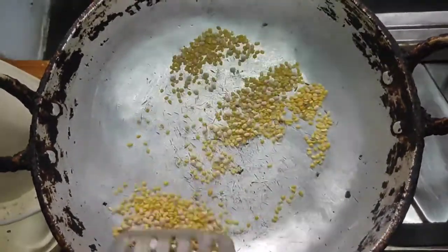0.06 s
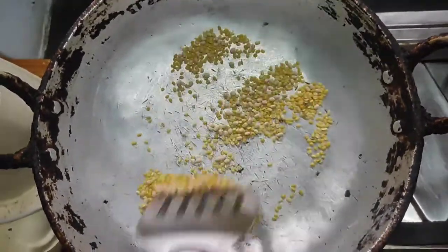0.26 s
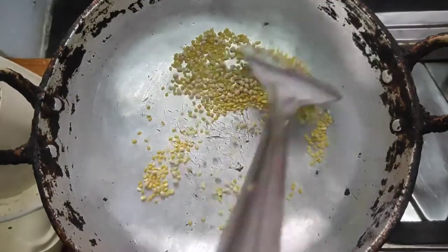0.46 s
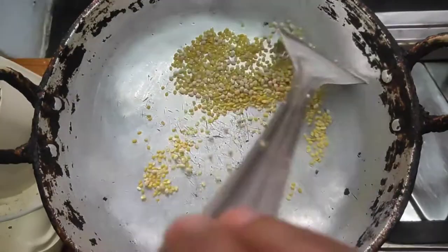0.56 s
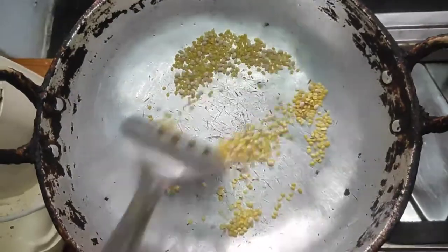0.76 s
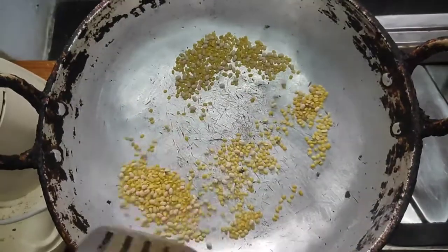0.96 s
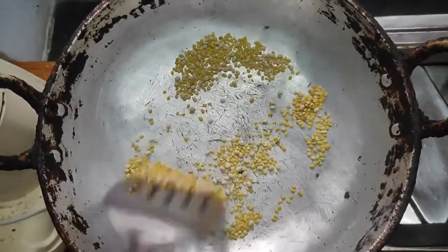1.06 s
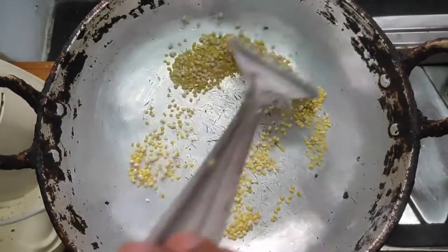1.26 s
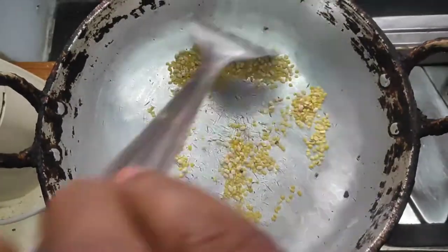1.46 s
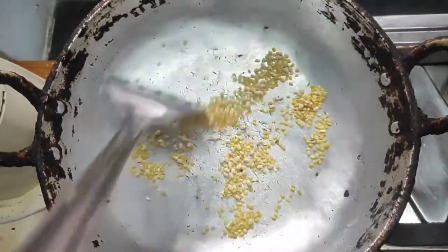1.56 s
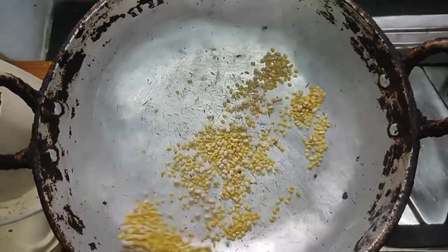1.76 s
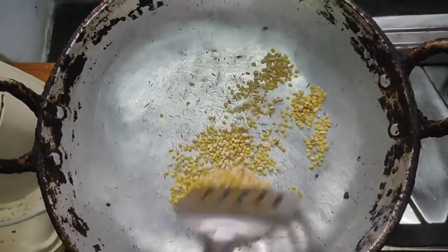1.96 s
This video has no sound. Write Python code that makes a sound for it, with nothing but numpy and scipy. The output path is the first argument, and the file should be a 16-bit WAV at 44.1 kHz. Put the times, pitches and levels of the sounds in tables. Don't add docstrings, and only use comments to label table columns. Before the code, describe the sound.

Steel spatula clanks and scrapes in a pan of pattering dry lentils above a softly roaring flame

```python
import sys
import numpy as np
from scipy import signal
from scipy.fft import rfft, irfft, next_fast_len
from scipy.io import wavfile
from scipy.ndimage import uniform_filter1d, map_coordinates

SR = 44100
rng = np.random.default_rng(int(sys.argv[2]) if len(sys.argv) > 2 else 0)


def voltage_ratio(level):
    return 10 ** (np.asarray(level, float) / 20)


def wav_record(signal):
    frames = np.transpose(np.atleast_2d(signal))
    bounded = np.clip(frames, -1, 1)
    quanta = np.round(bounded * 32767).astype(np.int16)
    wavfile.write(sys.argv[1], SR, quanta)


N = 88200


def unit(x):
    return x / np.sqrt(np.mean(x ** 2) + 1e-20)


def along(points, hz):
    f, value = np.transpose(points)
    return np.interp(np.log(hz + 1), np.log(f + 1), value)


def wobble(rate):
    knots = rng.standard_normal(int(N * rate / SR) + 4)
    return map_coordinates(knots, [np.arange(N) * rate / SR])


def filtered(x, response):
    n = x.shape[-1]
    padded = next_fast_len(n + min(n, SR // 2))
    spectrum = rfft(x, padded) * response(np.fft.rfftfreq(padded, 1 / SR))
    return irfft(spectrum, padded)[..., :n]


def modes(table, extra_db=0):
    centre, width, db = np.transpose(table)[..., None]
    gain = (-1) ** np.arange(len(table))[:, None] * voltage_ratio(db + extra_db)

    def response(f):
        return np.sum(gain * 1j * f * width / (centre ** 2 - f ** 2 + 1j * f * abs(width)), axis=0)
    return response


def grains(n, per_s):
    chance, sign, size = rng.random((3, n))
    level_db = -3.5 * np.log(size + 1e-4)
    return unit((chance < per_s / SR) * np.sign(sign - 0.5) * voltage_ratio(level_db))


# (f/Hz, likeness 0 to 1)
LIKENESS = [(60, 1), (300, 0.89), (700, 0.13), (2400, 0.059), (8000, 0.044)]


def rush(spectrum, pair):
    def split(hz):
        angle = np.arccos(np.clip(along(LIKENESS, hz), -1, 1)) / 2
        return voltage_ratio(along(spectrum, hz)) * [np.cos(angle), np.sin(angle)]
    mid, side = filtered(pair, split)
    return unit(np.array([mid + side, mid - side]))


# (f/Hz, width/Hz, level/dB)
FLAME_TONES = [(126.4, 30, -68.5), (265.4, 62, -65.5), (560, 17, -70), (847.6, 26, -74.5), (2160, 57, -87),
               (2757, 280, -85), (5385, 130, -70.5)]
# (f/Hz, level/dB per Hz)
ROAR_COLOUR = [(20, -15.5), (54, -12), (96, -5), (184, -7.5), (400, -11.5), (870, -17), (1050, -37),
               (1300, -63.5), (2500, -120)]
# (f/Hz, level/dB per Hz)
HISS_COLOUR = [(1300, -62.5), (1900, -52), (2200, -37.5), (2550, -41), (2900, -38), (3150, -42.5),
               (3500, -11), (5000, -14), (6500, -2), (7600, -1.5), (8200, -38.5)]


def burner():
    roar_noise, hiss_noise = rng.standard_normal((2, 2, N))
    roar = voltage_ratio(-58.5 + 3.2 * wobble(11.68)) * rush(ROAR_COLOUR, roar_noise)
    hiss = voltage_ratio(-62.5 + 1.5 * wobble(6.3)) * rush(HISS_COLOUR, hiss_noise)
    tones = np.zeros(N)
    for hz, width, db in FLAME_TONES:
        narrow = modes([(hz, width, 0)])
        tone = filtered(rng.standard_normal(N), lambda f: narrow(f) ** 2)
        tones += voltage_ratio(db + 1.2 * wobble(10.93)) * unit(tone)
    return roar + hiss + tones * voltage_ratio([[-1], [1]])


def shell():
    count, low_hz, high_hz, t60_s = 60, 1000, 7900, 0.09
    t = np.arange(SR // 8) / SR
    u = rng.random((4, count, 1))
    hz = low_hz + (high_hz - low_hz) * (np.arange(count)[:, None] + u[0]) / count
    decay_db = -60 * t / t60_s * (1.5 + u[1])
    sides = []
    for luck in u[2:]:
        tones = voltage_ratio(9 * luck + decay_db) * np.sin(2 * np.pi * hz * t + np.pi * luck)
        sides.append(np.sum(tones, axis=0))
    ring = np.array(sides)
    return ring / np.linalg.norm(ring[0]) + voltage_ratio(-15) * (t == 0)


def drag(table, level_db, per_s, valley):
    uneven_db = level_db + 2.2 * wobble(29.8) + 2.5 * wobble(90)
    jerks = grains(N, per_s) * [voltage_ratio(uneven_db), np.ones(N)]

    def response(hz):
        g = modes(table)(hz)
        return g * np.abs(g) ** valley
    ring, steady = filtered(jerks, response)
    return ring / np.std(steady)


# (t/s, edge speed level/dB, weight on pan level/dB)
STROKE = [(0, -68, -52), (0.081, -64.5, -65.5), (0.191, -77.5, -81.5), (.235, -70, -61.5), (.27, -60, -40),
          (0.359, -67, -54), (.47, -60, -57.5), (0.569, -83, -62), (.63, -62.5, -38), (.76, -65.5, -46),
          (0.808, -61, -66.5), (0.958, -78, -63), (1.099, -49.5, -43.5), (1.19, -55.5, -62),
          (1.361, -73, -65.5), (1.43, -63.5, -53), (1.55, -52.5, -57.5), (1.66, -59.5, -69),
          (1.8, -64.5, -90.5), (2, -61, -115.5)]
# (f/Hz, width/Hz, level/dB)
BODY = [(95, 30, -8), (130, 12, -6), (199, 13, -2), (268, 15, -2), (317, 28, -3), (422, 22, -2),
        (478, 24, -3), (561, 32, -2), (701, 26, 1), (812, 40, -7), (914, 30, -7), (1187, 30, -15)]
# (f/Hz, width/Hz, level/dB)
WALL = [(2160, 60, -1), (2215, 75, -3), (2762, 80, 0), (2835, 85, -3), (3640, 65, -8), (3925, 70, -9)]
# (f/Hz, width/Hz, level/dB)
BLADE = [(4590, 40, -10), (5025, 55, -9), (5300, 40, -3), (5460, 45, -4), (5890, 60, -5), (6050, 60, -1),
         (6380, 55, -3), (6545, 45, 0), (6715, 45, -2), (6960, 45, -3), (7195, 40, -2), (7400, 70, -8)]
# (f/Hz, level/dB per Hz)
PATTER_COLOUR = [(100, -28), (700, -16.5), (1100, -4.5), (1600, -19.5), (3200, -5.5), (5000, -1.5),
                 (6600, 2.5), (7600, -4.5)]


def scrape(small):
    knot_s, edge, weight = np.transpose(STROKE)
    t = np.arange(N) / SR
    edge_db, weight_db = np.interp(t, knot_s, edge), np.interp(t, knot_s, weight)
    lentil_db = -52 + 1.06 * ((edge_db + weight_db) / 2 + 56.5)
    taps = unit(filtered(grains(N, 6000), lambda hz: voltage_ratio(along(PATTER_COLOUR, hz))))
    patter = voltage_ratio(lentil_db - 5 + 3.1 * wobble(50.17) + 0.48 * wobble(150)) * taps
    out = signal.fftconvolve(patter[None], small, axes=1)[:, :N]
    out += voltage_ratio(-7) * drag(BODY, weight_db, per_s=900, valley=1.2)
    out += voltage_ratio(-16) * drag(WALL, lentil_db, per_s=350, valley=0.7)
    out += voltage_ratio(-2) * drag(BLADE, edge_db, per_s=3000, valley=0.9)
    return out


# (f/Hz, level/dB per Hz)
WASH_COLOUR = [(900, -49.5), (1500, -22.5), (2500, -10.5), (3300, -4.5), (4500, -2), (5500, -.5),
               (7000, -4), (8200, -9)]


def wash():
    knot_s, edge_db, weight_db = np.transpose(STROKE)
    stroke = voltage_ratio(np.interp(np.arange(N) / SR, knot_s, 0.46 * edge_db + 0.56 * weight_db))
    stroke = uniform_filter1d(stroke, round(0.03 * SR))
    rustle = rush(WASH_COLOUR, np.array([grains(N, 12000), grains(N, 12000)]))
    return stroke * voltage_ratio(-6 + 1.5 * wobble(45)) * rustle


def strike(table, hits, small, per_s, blow_size, hard, soft, reach_oct, crack_oct, crack_db, gain_db):
    out, t = np.zeros((2, N + SR)), np.arange(SR // 4) / SR
    for start_s, db, spot_hz, skid_s in hits:
        slide = voltage_ratio(-60 * t / max(skid_s, 0.005)) * grains(len(t), per_s)
        skid = filtered(slide / np.linalg.norm(slide), lambda hz: (1 + 1j * hz / (soft * spot_hz)) ** -6)
        blow = filtered(1. * (t == 0), lambda hz: (1 + 1j * hz / (hard * spot_hz)) ** -4)
        sharpness = min(1, 0.06 / skid_s) ** 3
        push = skid - blow_size * sharpness * blow

        octaves_away = np.log2(np.transpose(table)[0] / spot_hz) / reach_oct
        mode_db = -6 * octaves_away ** 2 + 2 * rng.standard_normal(len(table))
        ring = filtered(push, modes(table, mode_db[:, None]))

        broad = modes([(spot_hz, spot_hz * crack_oct, 0)])
        crack = filtered(push, lambda hz: broad(hz) ** 2)
        if small is not None:
            crack = signal.fftconvolve(crack[None], small, axes=1)[:, :len(t)]
        hit = ring / np.linalg.norm(ring) + voltage_ratio(crack_db) * crack / np.linalg.norm(crack)
        first = round(start_s * SR)
        out[:, first:first + len(t)] += voltage_ratio(db + gain_db) * hit
    return out[:, :N]


# (t/s, level/dB, centre f/Hz, skid t60/s)
CHIRPS = [(0.08, -55.5, 5800, 0.047), (0.202, -33.5, 6540, 0.025), (.2415, -30, 6810, 0.09),
          (.322, -50, 5510, 0.033), (0.374, -44.5, 6520, .05), (0.5799, -25, 6610, 0.018),
          (0.6, -49.5, 6600, 0.11), (0.658, -47, 5970, .05), (.662, -39, 7270, 0.19),
          (0.694, -40.5, 7360, 0.085), (.735, -43, 6380, 0.17), (0.88, -49.5, 6670, .05),
          (.970, -30.5, 6720, 0.054), (0.971, -31, 5370, 0.098), (0.996, -33.5, 6760, .06),
          (1.043, -38.5, 6410, 0.074), (1.122, -38, 6050, 0.091), (1.134, -39, 5870, 0.035),
          (1.377, -36.5, 6770, 0.025), (1.383, -37, 6300, 0.077), (1.47, -47.5, 7250, 0.11),
          (1.494, -42.5, 7300, 0.28), (1.494, -38.5, 6230, 0.18), (1.711, -55, 6640, 0.044),
          (1.843, -65, 5430, 0.032)]
# (t/s, level/dB, centre f/Hz, skid t60/s)
THUDS = [(0.2008, -37.5, 428, 0.0052), (0.211, -39.5, 187, 0.8), (.2415, -47.5, 598, .03),
         (.25, -38, 514, 0.12), (.299, -52.5, 293, 0.11), (0.321, -48, 520, 0.055),
         (0.3769, -36, 400, 0.014), (0.5792, -33.5, 487, .03), (.596, -40, 792, 0.045),
         (0.602, -40, 166, 0.8), (.617, -40, 560, .1), (.657, -40.5, 540, 0.063), (.666, -41.5, 700, 0.11),
         (.747, -46.5, 228, .08), (0.797, -50, 200, 0.041), (.86, -50, 269, 0.18), (.969, -44.5, 670, 0.22),
         (.972, -55.5, 1230, 0.43), (1.042, -43, 556, 0.047), (1.048, -36.5, 493, 0.1),
         (1.096, -46, 405, 0.12), (1.121, -47.5, 490, 0.025), (1.1329, -39, 595, 0.017),
         (1.141, -50, 610, 0.018), (1.3762, -40.5, 454, 0.012), (1.399, -42.5, 702, 0.1),
         (1.404, -43, 115, 0.093), (1.494, -43.5, 532, 0.21), (1.905, -51, 400, 0.24),
         (1.914, -49.5, 132, 0.055), (1.928, -52, 330, .14), (1.954, -50, 164, 0.022),
         (1.973, -45, 121.5, 0.11)]
# (t/s, level/dB, centre f/Hz, skid t60/s)
CLANKS = [(0.201, -48, 2550, .015), (.2414, -46, 2290, 0.018), (.249, -46, 2520, 0.11),
          (.31, -51.5, 2790, 0.031), (.326, -43.5, 2270, .03), (0.376, -35, 2300, 0.0087),
          (.402, -53, 2200, 0.019), (0.581, -28.5, 2680, 0.02), (.608, -51.5, 2800, .06),
          (0.667, -41.5, 2800, 0.041), (0.702, -49.5, 2770, 0.048), (.741, -49, 2270, 0.082),
          (0.825, -59, 2920, 0.069), (.970, -48.5, 2170, 0.11), (1.042, -47.5, 2220, 0.014),
          (1.059, -46, 2900, 0.25), (1.097, -45.5, 2650, 0.14), (1.122, -32.5, 2930, 0.01),
          (1.131, -40, 2180, 0.096), (1.161, -41, 2330, 0.034), (1.378, -35.5, 2570, 0.022),
          (1.509, -58, 2880, .04), (1.533, -51.5, 2900, 0.094), (1.574, -59.5, 2150, 0.072),
          (1.661, -65, 2160, 0.4)]


def knocks(small):
    chirps = strike(BLADE, CHIRPS, small, per_s=9000, blow_size=0.75, hard=6, soft=4,
                    reach_oct=0.075, crack_oct=1.4, crack_db=0.2, gain_db=24.5)
    thuds = strike(BODY, THUDS, None, per_s=4800, blow_size=1.5, hard=3.2, soft=3,
                   reach_oct=0.63, crack_oct=2.6, crack_db=-1, gain_db=23.5)
    clanks = strike(WALL, CLANKS, small, per_s=3700, blow_size=1.2, hard=6, soft=4,
                    reach_oct=0.24, crack_oct=1.5, crack_db=-5, gain_db=25)
    return chirps + thuds + clanks


# (f/Hz, t60/s)
KITCHEN = [(200, 0.31), (1000, 0.33), (2500, 0.34), (8000, 0.14)]


def kitchen(x):
    hz, t, z = signal.stft(rng.standard_normal((2, SR // 2)), SR, nperseg=256)
    fade = voltage_ratio(-60 * t / along(KITCHEN, hz)[:, None])
    tail = rush([(100, 0)], signal.istft(z * fade, SR, nperseg=256)[1])
    late = np.pad(x, (150, 0))
    return signal.fftconvolve(late[None], tail / np.linalg.norm(tail[0]), axes=1)[:, :N]


# (f/Hz, level/dB)
LEAN = [(60, -3), (240, 1.8), (600, -0.9), (1200, 1.6), (2170, 2.9), (2800, -8), (4030, -4.5), (6000, -7),
        (8120, -2.5)]
# (f/Hz, phase/rad)
LEAD = [(300, 0.5), (690, 0.02), (1120, -0.93), (2200, 1.3), (2750, 2.5), (5400, 3.5), (6000, -0.4),
        (6600, 2.2), (7300, 0.83)]


def two_ports(x):
    side = np.array([[0.5], [-0.5]])
    return filtered(x, lambda hz: voltage_ratio(side * along(LEAN, hz)) * np.exp(1j * side * along(LEAD, hz)))


# (f/Hz, level/dB)
PHONE_TONE = [(20, -8), (70, -4), (120, 2.5), (7500, 1.5), (7800, -7.5), (8050, -23.5), (8500, -34.5),
              (9500, -44.5), (15000, -75)]


def phone(x):
    return filtered(x, lambda hz: voltage_ratio(along(PHONE_TONE, hz)))


def scene():
    gas = burner()
    small = shell()
    pan = scrape(small) + knocks(small)
    room = voltage_ratio(-9) * kitchen(pan.mean(axis=0))
    return two_ports(pan + room + wash()) + gas


def low_pass(x):
    return signal.sosfilt(signal.butter(12, 8720, fs=SR, output="sos"), x)


def record(dry):
    return low_pass(phone(dry))


dry = scene()
out = record(dry)
wav_record(out)
```